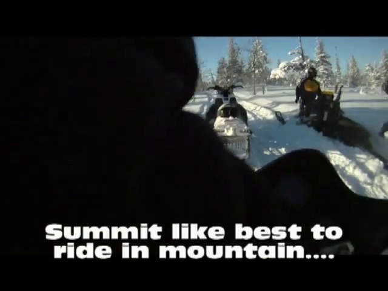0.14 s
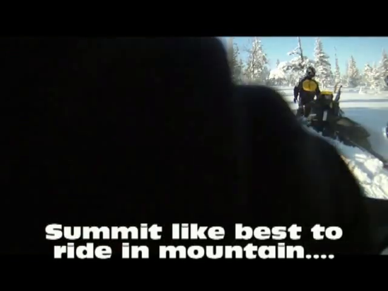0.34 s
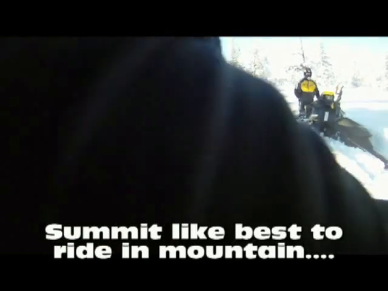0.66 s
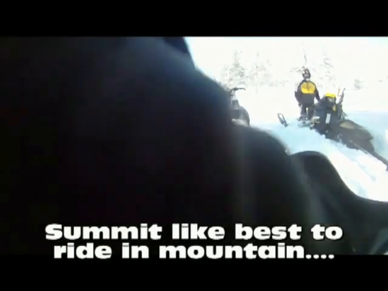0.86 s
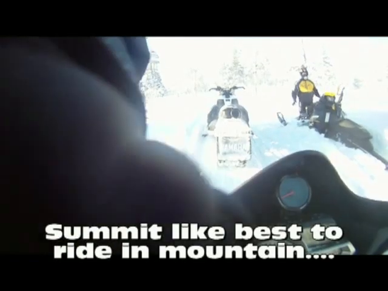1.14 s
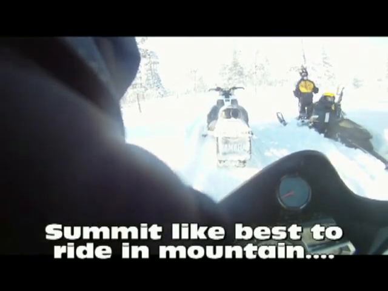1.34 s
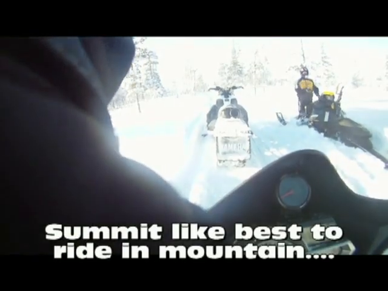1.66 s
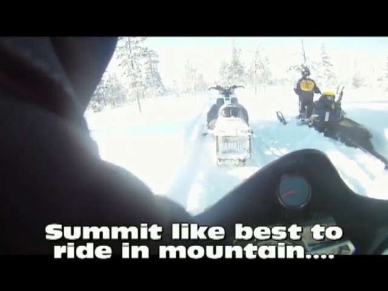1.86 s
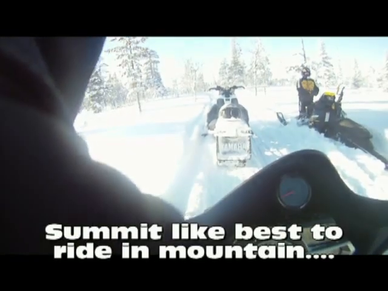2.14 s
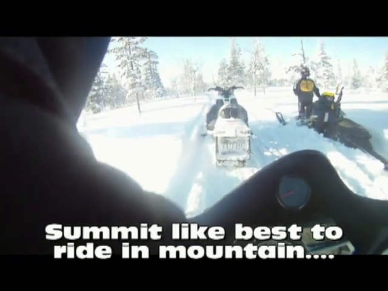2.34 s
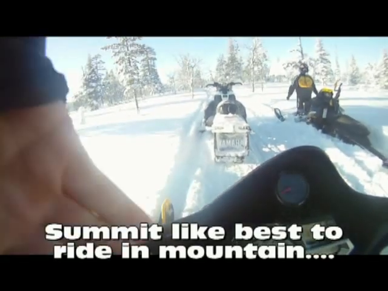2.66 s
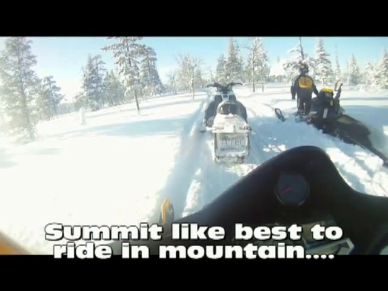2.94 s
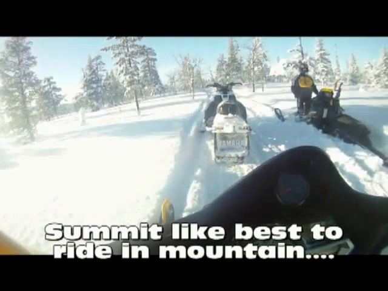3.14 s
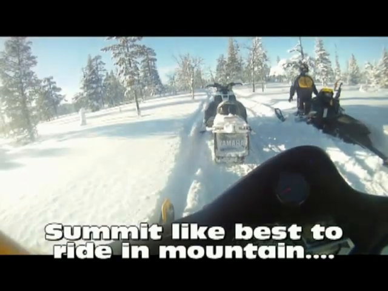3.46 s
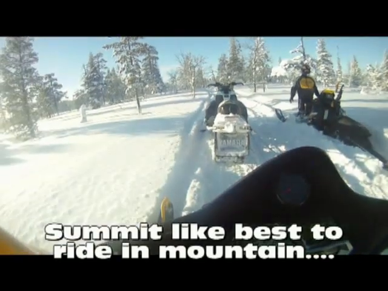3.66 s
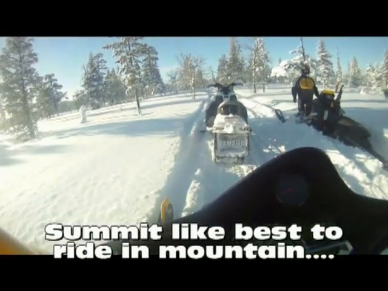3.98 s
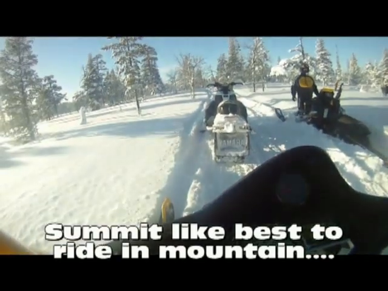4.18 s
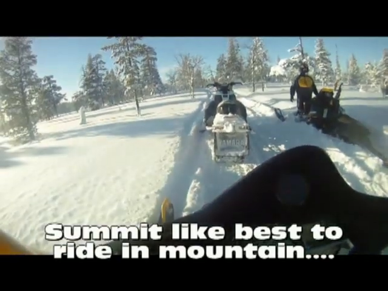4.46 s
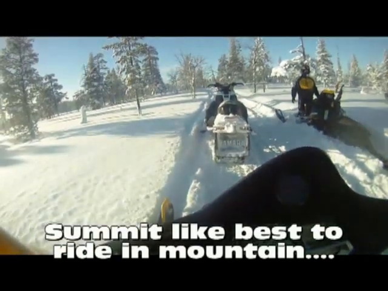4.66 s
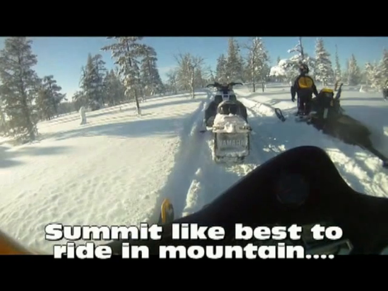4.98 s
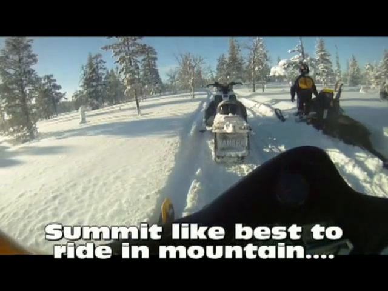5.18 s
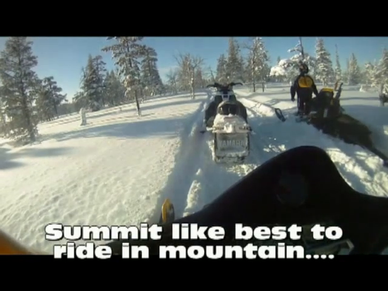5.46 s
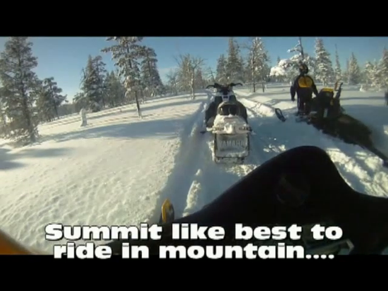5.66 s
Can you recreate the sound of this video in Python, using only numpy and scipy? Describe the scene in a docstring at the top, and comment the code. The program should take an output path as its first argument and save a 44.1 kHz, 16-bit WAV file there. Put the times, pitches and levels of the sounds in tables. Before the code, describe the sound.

A two-stroke twin snowmobile idles close by for about six seconds, at roughly twenty turns a second, hunting slightly but never revving. Each turn gives a strong hollow thump around 170 to 290 Hz and a weaker, irregular one, so the idle lopes. Soft intake gulps, low gas rumble and dry metallic clatter fill the gaps. The exhaust is loudest at the start and settles within half a second; stronger bangs stand out near 1.3, 2.6 and 5.5 s. A hard plastic knock lands at 0.9 s, then a quick cluster at 2.8 to 3.0 s, with lighter ticks at 4.0, 4.6 and 4.9 s. Clatter treble dulls gradually until about 2.6 s, then brightens. Very faint jacket rustles come and go. Other sleds swell in by 0.5 s as a wavering, beating drone. Dry open air, mono small-camera sound, peaks briefly ducking the level, thin sizzle on top.

```python
"""A two-stroke twin snowmobile idles on snow: pulse excitation of a resonant muffler makes uneven thumps.
Intake pulses, turbulent gas and mechanical impacts accompany each turn, the impacts as a clatter.
Nearby, plastic gear knocks (damped modes) and the rider's jacket rustles (stick-slip grains of noise).
Other sleds drone behind as wandering, beating tones. A small camera samples it all at 12 kHz and holds
each sample, which adds a thin sizzle."""
import sys
import numpy as np
from scipy import signal
from scipy.fft import rfft, irfft
from scipy.io import wavfile
from scipy.ndimage import map_coordinates

SR = 44100
rng = np.random.default_rng(int(sys.argv[2]) if len(sys.argv) > 2 else 0)


def transcribe(signal):
    """Save signal, clipped to [-1, 1], as a 16-bit WAV file at the path in sys.argv[1]."""
    frames = np.atleast_2d(signal).T
    limited = np.clip(frames, -1, 1)
    pcm = np.round(limited * 32767).astype(np.int16)
    wavfile.write(sys.argv[1], SR, pcm)


N = 256662
TIME = np.arange(N) / SR  # s

# Crankshaft speed, hunting round its idle: time_s, speed_turns_per_s
CRANK_SPEED = [(0.0, 19.91), (0.75, 20.72), (0.95, 20.19), (1.3, 20.77), (1.8, 20.31), (2.95, 20.37),
               (3.1, 20.75), (3.65, 20.04), (4.15, 20.7), (4.6, 20.18), (5.3, 20.75), (5.8, 20.15)]
# Bangs of the first cylinder that stand out: time_s, level_db (over a nominal firing)
BANGS = [(.28, 3.5), (1.31, 6), (2.58, 5.5), (2.78, 3.5), (5.52, 4.5)]
# Spectrum of one exhaust puff: frequency_hz, gain_db
PUFF_SPECTRUM = [(30, -50), (60, -60), (130, -30), (165, -1), (215, -2), (285, -1), (335, -7), (400, -23.5),
                 (520, -26.5), (800, -42.5), (1500, -56.5)]
# Muffler resonances: frequency_hz, width_hz, gain_db
MUFFLER_RESONANCES = [(166.4, 46, -8.5), (180.6, 4.3, 7.5), (249, 9, -1), (281.3, 25, -6)]
# Smooth pulsing of the gas flow: crank_multiple (ratio), level_db (rms)
FLOW_HARMONICS = [(2, -31), (4, -37), (8, -33)]
# Spectrum of a gulp of intake air: frequency_hz, gain_db
GULP_SPECTRUM = [(30, -38), (70, -23.5), (120, -2.5), (175, -1), (225, -11), (350, -13.5), (700, -59)]
# Spectrum of turbulent exhaust gas: frequency_hz, density_db (per Hz, relative)
RUMBLE_SPECTRUM = [(15, -33), (30, -21), (50, 0), (100, 0), (200, -1.5), (290, -0.5), (360, -7.5),
                   (520, -10), (700, -17.5), (950, -31), (2000, -49)]
# Ring of engine block and hood: frequency_hz, density_db (per Hz, relative)
CLATTER_SPECTRUM = [(300, 5.5), (700, -2.5), (950, -2.5), (1200, 2.5), (1550, -3), (2000, 4.5), (2500, -4),
                    (3100, -1.5), (3800, -10), (5000, -14.5), (6000, -24)]
# Engine treble as the rider's body shields the camera: time_s, gain_db
BODY_SHADE = [(0, 2), (.4, -1.5), (1.8, -4), (2.65, -2.5), (2.8, 0.5), (5.8, 1)]
# Modes of the plastic gear: frequency_hz, t60_s, gain_db
PLASTIC_MODES = [(500, 0.037, -1.5), (639, 0.066, -2), (728, 0.074, -1), (810, 0.064, -3), (1122, 0.042, 0),
                 (1394, 0.024, 4.5), (1740, 0.02, -4), (2250, 0.021, -0.5), (2530, 0.014, -6.5),
                 (2725, 0.018, -15.5), (2997, 0.023, -2), (3180, 0.01, -1), (3450, 0.03, -7),
                 (4830, 0.007, -4)]
# Knocks and ticks on the gear: start_s, crack_db, crack_pitch_hz, thud_db (both relative)
GEAR_KNOCKS = [(.0697, -41, 3100, -22.5), (.539, -29.5, 3170, -34), (.9097, -4, 2200, -12),
               (1.117, -33, 1400, -39), (1.271, -32, 1400, -28), (2.042, -24.5, 2220, -25.5),
               (2.7945, -11, 3180, -32), (2.8465, -18, 3200, -31), (2.866, -24, 3200, -36),
               (2.928, -7.5, 3300, -8), (2.995, -22.5, 2100, -51), (4.0025, -16.5, 2750, -45),
               (4.149, -25.5, 2900, -32), (4.588, -14.5, 2950, -26.5), (4.9045, -25, 3130, -25)]
# Spectrum of the jacket fabric: frequency_hz, density_db (per Hz, relative)
FABRIC_SPECTRUM = [(400, 3), (1200, 7), (2400, 1.5), (3200, 6), (4000, -2), (5000, -4), (6000, -15.5)]
# Moves of the rider that rub the jacket: start_s, length_s, level_db (relative)
JACKET_RUBS = [(0, 0.11, -40.5), (0.159, .18, -38.5), (1.168, 0.083, -35.5), (1.245, .07, -40.5),
               (1.79, 0.17, -41.5), (2.98, 0.1, -36.5), (3.7, 0.237, -42), (4.496, 0.32, -42.5)]
# Exhaust tones of the other sleds: pitch_hz, level_db (rms, before the swell), wander_hz
SLED_TONES = [(37.4, -37.5, .5), (60, -31, .5), (69.6, -26, .5), (74.8, -26, 1.2), (109, -31, 1.5),
              (112.3, -31, 1.5), (259, -35, 2.5), (388, -41, 3), (452, -40, 3.5), (510, -43, 5),
              (527, -44, 6)]

BEFORE_BANG_DB = 0.5  # the firing before a bang, over a nominal one
EXHAUST_DB, EXHAUST_START_DB, EXHAUST_SETTLE_S = -17, 5.5, 0.42  # gain, extra at the start, its decay
CRACK_OCTAVES = 0.47  # spread of the modes excited round the crack pitch
CONTACT_S = 0.00043  # time constant of a blow's rise
THUD_HZ, THUD_FALL_DB_PER_OCTAVE = 760, 11  # corner of the hollow thud and its fall above
SCRAPE_DB, SCRAPE_DECAY_S = -2.5, 0.0021  # contact noise at the crack pitch, over the crack
SNAP_DB, SNAP_DECAY_S = -3, 0.00077  # shorter, bright contact noise, over the crack
RUB_EDGE_S, RUB_SLIPS_PER_S, RUB_SLIP_DB = 0.016, 32, 1.7  # fades of a move; rate and spread of slips
DRONE_START_DB, DRONE_RISE_S, DRONE_FULL_S = -5.5, 0.21, 0.52  # the swell: first gain, begin, end
TOP_HZ = 15400  # low-pass edge of the output


def exhaust(turns):
    """Source and filter: two cylinders puff into one muffler; the weak, uneven second makes the idle lope."""
    strong = firings(turns, angle=0, scatter_db=1.8, jitter_s=.00025, hard=BANGS)
    weak = firings(turns, angle=.51, scatter_db=4, jitter_s=.0004)
    puffs = colour(strong + undb(-2.5) * weak, PUFF_SPECTRUM)
    ring = sum(undb(db) * resonate(puffs, hz, width_hz) for hz, width_hz, db in MUFFLER_RESONANCES)
    flow = sum(level(np.cos(2 * np.pi * round(k) * turns), db) for k, db in FLOW_HARMONICS)
    settling_db = EXHAUST_DB + EXHAUST_START_DB * np.exp(-TIME / EXHAUST_SETTLE_S)
    return -level(puffs + ring, -2.07) * undb(settling_db) - flow


def intake(turns):
    """Pulse excitation: a soft gulp of air comes just ahead of the strong firing."""
    gulps = firings(turns, angle=-.115, scatter_db=2, jitter_s=.0004)
    return -level(colour(gulps, GULP_SPECTRUM), -28.5)


def turbulence(turns):
    """Modulated flow noise: low gas noise swells round each firing."""
    strong_swell = .55 * once_a_turn(turns, at=-.1, width=.13)
    weak_swell = .55 * once_a_turn(turns, at=.58, width=.24)
    rumble = colour(rng.standard_normal(N), RUMBLE_SPECTRUM)
    return level(rumble * (1 + strong_swell + weak_swell), -23.5)


def clatter(turns):
    """Random impacts: pistons, clutch and panels chatter most strongly near the strong firing."""
    impacts = rng.standard_normal(N) * undb(2.0 * walk(420))
    load = 1 + .13 * once_a_turn(turns, at=-.04, width=.1)
    chatter = level(colour(impacts * load, CLATTER_SPECTRUM), -36.5)
    low = signal.sosfiltfilt(signal.butter(2, 1700, fs=SR, output="sos"), chatter)
    treble = chatter - low
    return low + treble * undb(curve(BODY_SHADE))  # long waves bend round the rider


def gear():
    """Modal synthesis: blows ring shared modes, a thud in the low ones and a crack pitched by where it lands."""
    out = np.zeros(N + SR)
    t = np.arange(SR // 10) / SR
    hz, t60, db = np.transpose(PLASTIC_MODES)
    for s, crack_db, crack_hz, thud_db in GEAR_KNOCKS:
        crack = undb(crack_db) * np.exp(-(np.log2(hz / crack_hz) / CRACK_OCTAVES) ** 2)
        octaves_above = np.maximum(np.log2(hz / THUD_HZ), 0)
        thud = undb(thud_db - THUD_FALL_DB_PER_OCTAVE * octaves_above)

        detuned = hz * (1 + 0.012 * rng.standard_normal(len(hz)))
        phase = rng.random((len(hz), 1))  # cycles
        decay = np.exp(-np.log(1000) * t / t60[:, None])
        modes = np.sin(2 * np.pi * (np.outer(detuned, t) + phase)) * decay
        ring = (undb(db) * (crack + thud)) @ modes

        scrape = resonate(rng.standard_normal(len(t)), crack_hz, .7 * crack_hz)
        scrape = undb(crack_db + SCRAPE_DB) * scrape * np.exp(-t / SCRAPE_DECAY_S)
        snap = resonate(rng.standard_normal(len(t)), hz=3600, width_hz=3100)
        snap = undb(crack_db + SNAP_DB) * snap * np.exp(-t / SNAP_DECAY_S)
        contact = 1 - np.exp(-t / CONTACT_S)
        start = int(s * SR)
        out[start:start + len(t)] += (ring + scrape) * contact + snap
    return undb(2.5) * out[:N]


def jacket():
    """Stick-slip friction: stiff fabric slips in small grains, in uneven swells as long as the rider moves."""
    grains = rng.standard_normal(N) * undb(4.0 * walk(300))
    rub = np.zeros(N)
    for s, length_s, db in JACKET_RUBS:
        edge_distance_s = np.minimum(TIME - s, s + length_s - TIME)
        rub += undb(db) * np.clip(edge_distance_s / RUB_EDGE_S, 0, 1)
    slips = undb(RUB_SLIP_DB * walk(RUB_SLIPS_PER_S))
    return level(colour(grains, FABRIC_SPECTRUM), 1) * rub * slips


def other_sleds():
    """Beating: exhaust tones wander in pitch and level against each other and swell in near the start."""
    tones = np.zeros(N)
    for hz, db, wander_hz in SLED_TONES:
        cycles = np.cumsum(hz + wander_hz * walk(5)) / SR + rng.random()
        tones += level(np.sin(2 * np.pi * cycles) * undb(1.65 * walk(9.9)), db)
    return tones * undb(curve([(DRONE_RISE_S, DRONE_START_DB), (DRONE_FULL_S, 0)]))


def firings(turns, angle, scatter_db, jitter_s, hard=()):
    """Impulse train: one impulse a turn at a crank angle in turns, scattered in size and timing."""
    chance = rng.standard_normal((160, 2))
    number = np.arange(int(turns[-1] - angle) + 1)
    times = np.interp(number + angle, turns, TIME) + jitter_s * chance[number, 0]
    db = scatter_db * np.clip(chance[number, 1], -2, 1)
    for s, extra_db in hard:
        bang = np.argmin(abs(times - s))
        db[bang - 1], db[bang] = BEFORE_BANG_DB, extra_db
    samples = np.clip(times * SR, 0, N - 1).astype(int)
    return np.bincount(samples, undb(db), N)


def once_a_turn(turns, at, width):
    """Periodic modulation: a smooth bump at one crank angle; both settings in turns."""
    return np.exp(-(np.sin(np.pi * (turns - at)) / (np.pi * width)) ** 2)


def resonate(x, hz, width_hz):
    """Second-order resonance with gain 1 at its centre."""
    return signal.lfilter(*signal.iirpeak(hz, hz / width_hz, fs=SR), x)


def colour(x, points):
    """Spectral shaping: filter by (Hz, dB) points joined along log frequency."""
    hz, db = np.transpose(points)
    bins = np.arange(N + 1) * SR / (2 * N)
    gain = undb(np.interp(np.log(bins + 1), np.log(hz), db))
    return irfft(rfft(x, 2 * N) * gain)[:N]


def walk(rate):
    """Band-limited drift: a smooth curve of rms 1 through random points, rate of them per second."""
    steps = rng.standard_normal(4096)
    return level(map_coordinates(steps, [TIME * rate], order=3), 0)


def curve(rows):
    """Linear interpolation: join (s, value) rows by straight lines."""
    return np.interp(TIME, *np.transpose(rows))


def level(x, db):
    """Root-mean-square normalisation to a level in dB."""
    return x * undb(db) / np.sqrt(np.mean(x ** 2))


def undb(db):
    """Logarithmic scale: decibels to amplitude gain."""
    return 10 ** (np.asarray(db) / 20)


def gain_control(x, threshold, release_s):
    """Feed-forward gain reduction: a peak over the threshold ducks the sound; the gain then creeps back."""
    peaks = np.minimum(abs(x[0]), 1)  # the detector saturates at full scale
    excess = np.maximum(peaks / threshold, 1) - 1
    fade = TIME / release_s
    held = np.exp(np.maximum.accumulate(np.log(excess + 1e-9) + fade) - fade)  # peak hold, decaying
    attack = np.exp(-1 / (.004 * SR))  # 4 ms smoothing
    return x / (1 + signal.lfilter([1 - attack], [1, -attack], held))


def scene():
    """Superposition in a free field: snow swallows all echo; one microphone feeds both channels."""
    turns = np.cumsum(curve(CRANK_SPEED)) / SR
    turns = turns - np.interp(.0372, TIME, turns)  # the first firing falls at 0.0372 s
    engine = exhaust(turns) + intake(turns) + turbulence(turns) + clatter(turns)
    sound = engine + gear() + jacket() + other_sleds()
    return np.array([sound, sound])


def record(dry):
    """Zero-order hold: peaks duck the gain; held 12 kHz samples mirror the sound around 12 kHz as a sizzle."""
    ducked = gain_control(dry, threshold=0.6, release_s=0.046)
    ducked = signal.sosfilt(signal.butter(2, 22, "high", fs=SR, output="sos"), ducked)
    sampled = np.clip(signal.resample_poly(ducked, 12000, SR, axis=1), -1, 1)
    steps = np.repeat(sampled, 4, axis=1)  # each sample held for four at 48 kHz
    held = signal.resample_poly(steps, SR, 48000, axis=1)[:, :N]
    return signal.sosfilt(signal.ellip(10, .2, 80, TOP_HZ, fs=SR, output="sos"), held)


dry = scene()
out = record(dry)
transcribe(out)
```